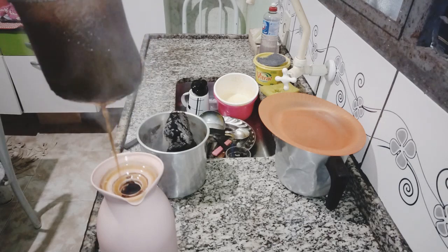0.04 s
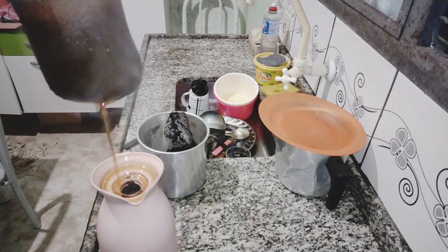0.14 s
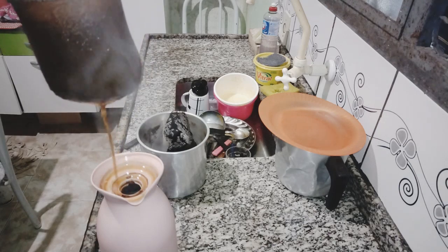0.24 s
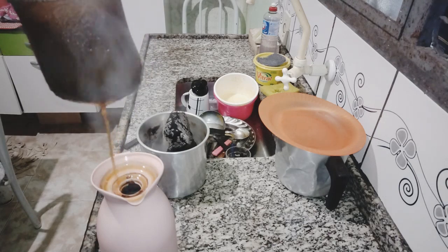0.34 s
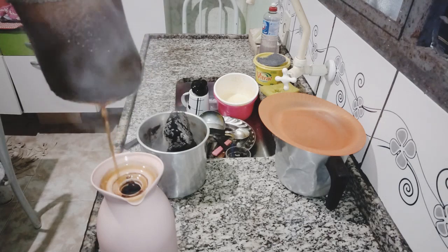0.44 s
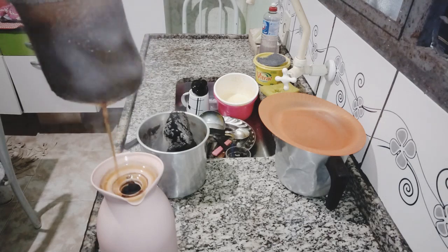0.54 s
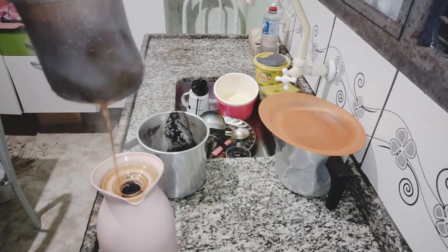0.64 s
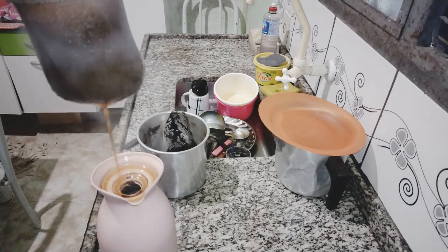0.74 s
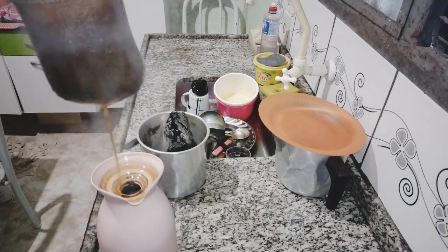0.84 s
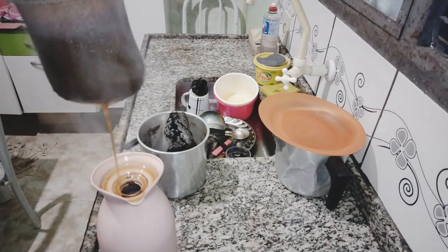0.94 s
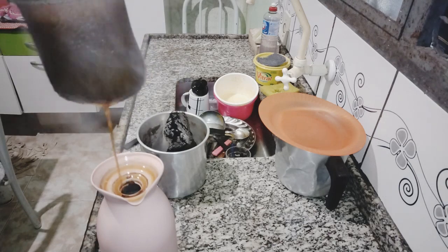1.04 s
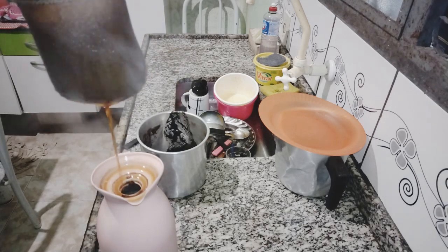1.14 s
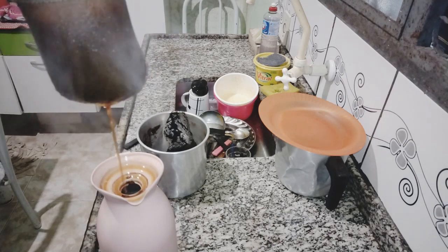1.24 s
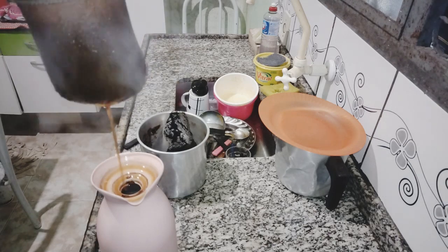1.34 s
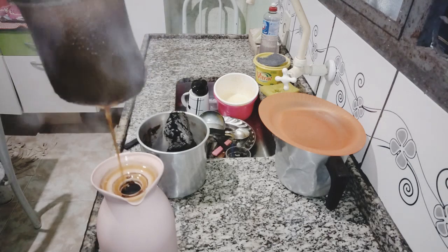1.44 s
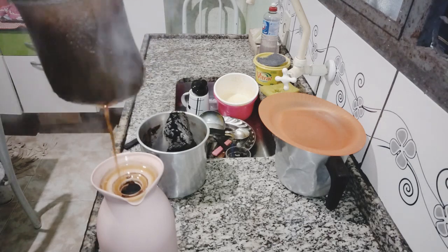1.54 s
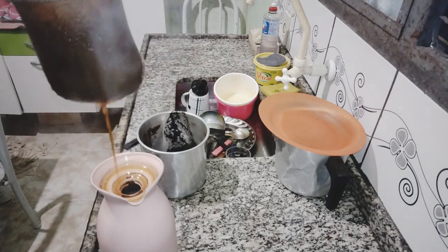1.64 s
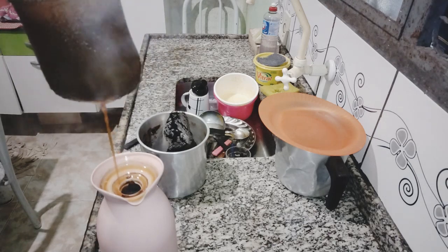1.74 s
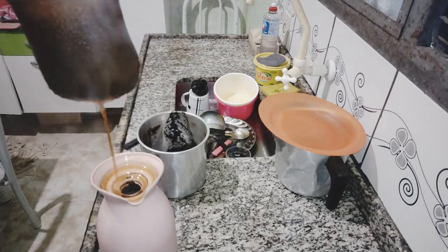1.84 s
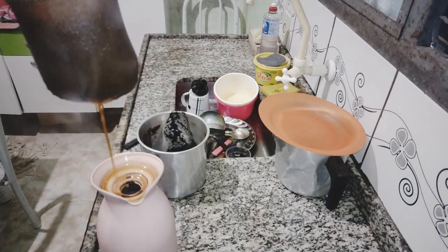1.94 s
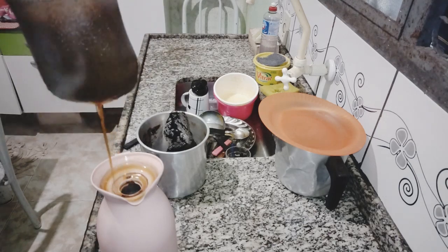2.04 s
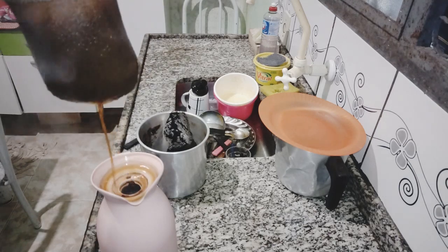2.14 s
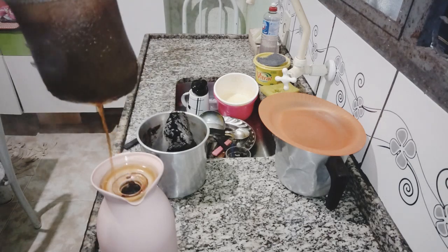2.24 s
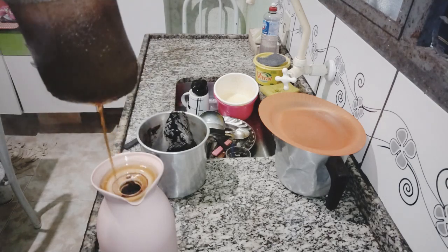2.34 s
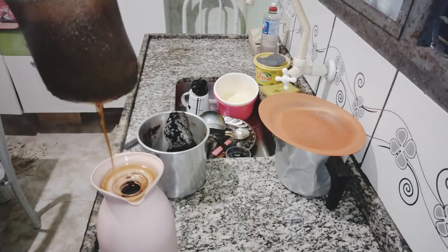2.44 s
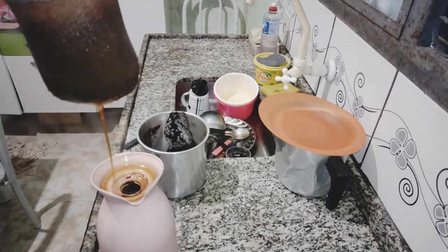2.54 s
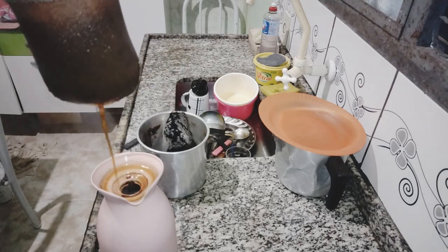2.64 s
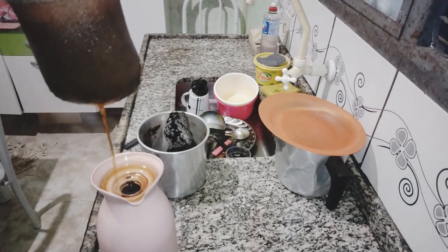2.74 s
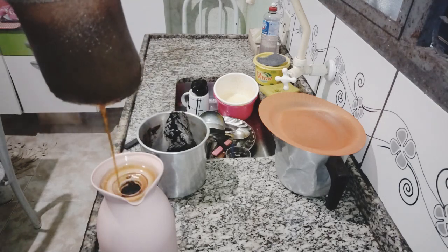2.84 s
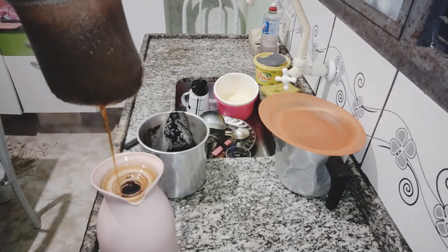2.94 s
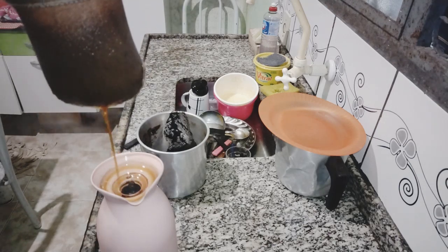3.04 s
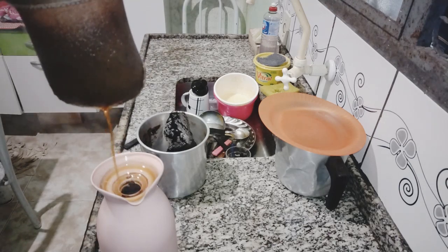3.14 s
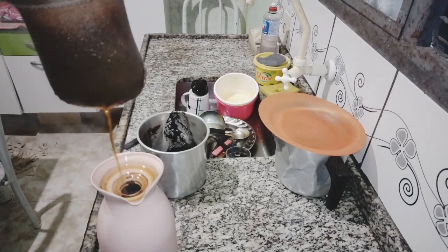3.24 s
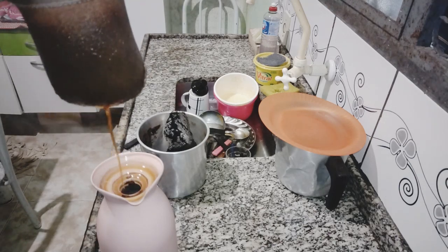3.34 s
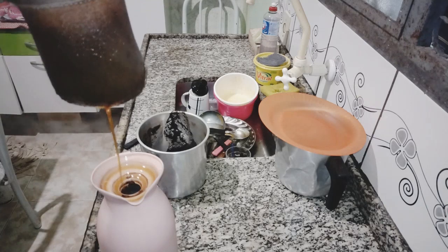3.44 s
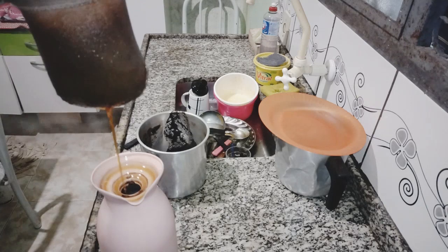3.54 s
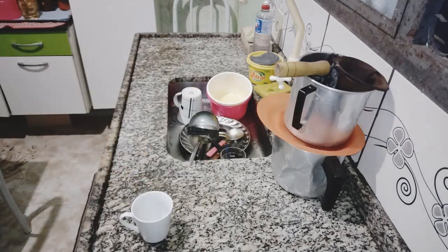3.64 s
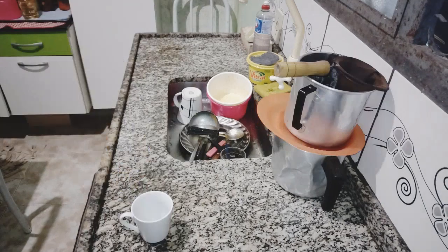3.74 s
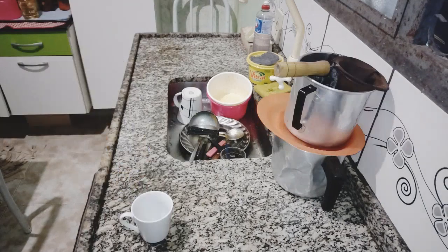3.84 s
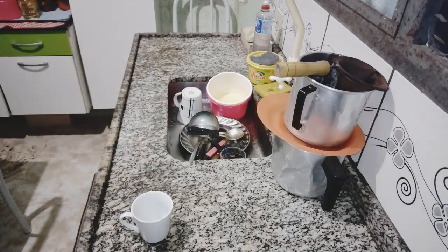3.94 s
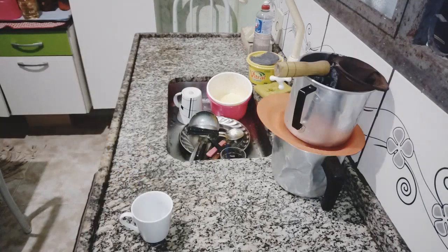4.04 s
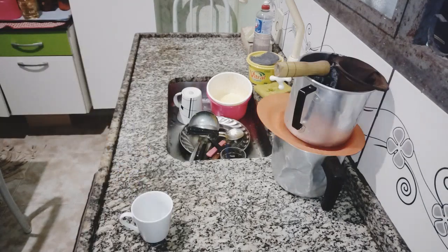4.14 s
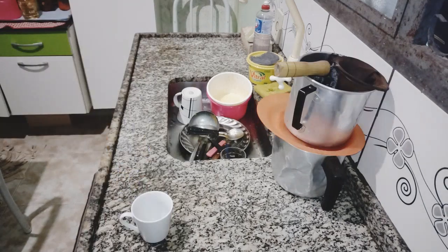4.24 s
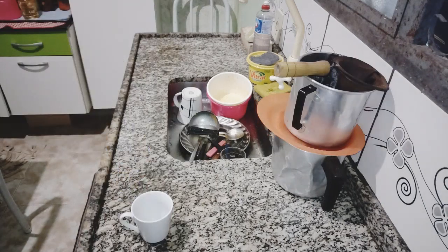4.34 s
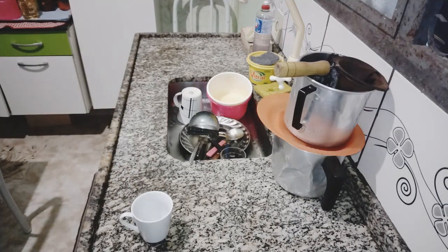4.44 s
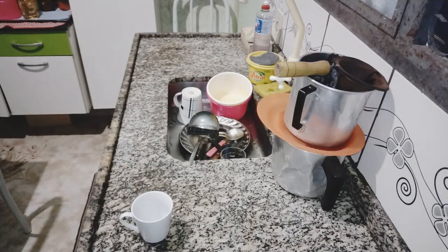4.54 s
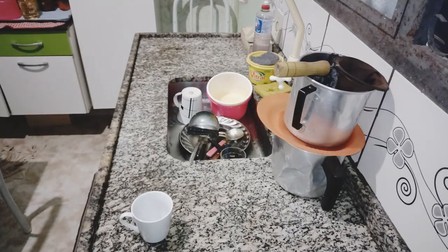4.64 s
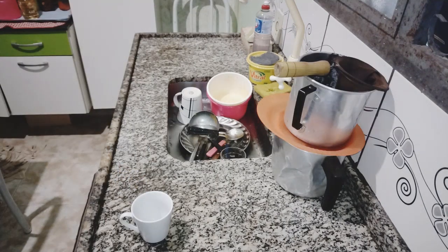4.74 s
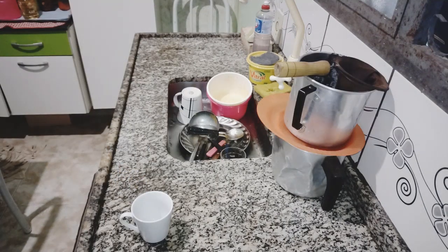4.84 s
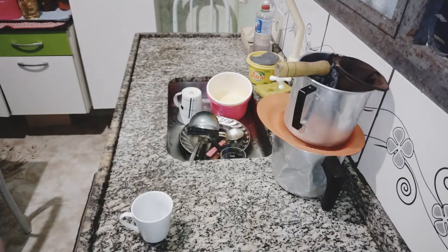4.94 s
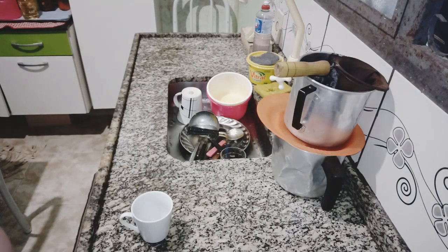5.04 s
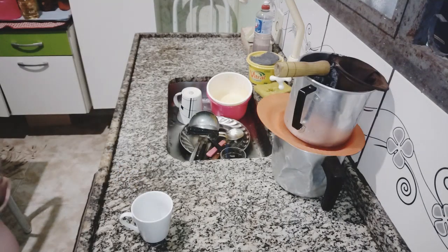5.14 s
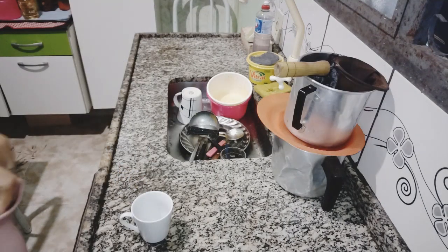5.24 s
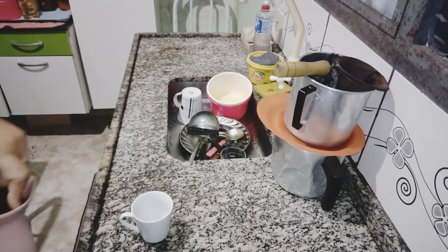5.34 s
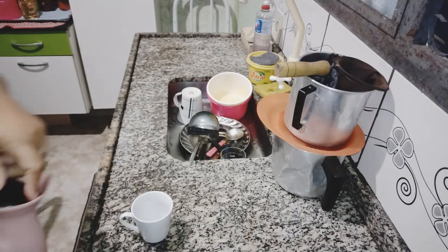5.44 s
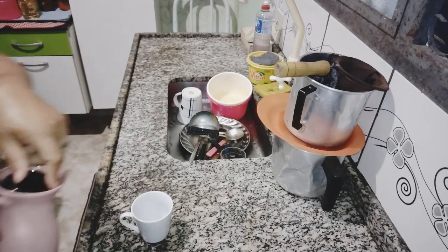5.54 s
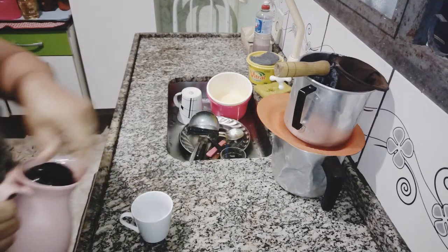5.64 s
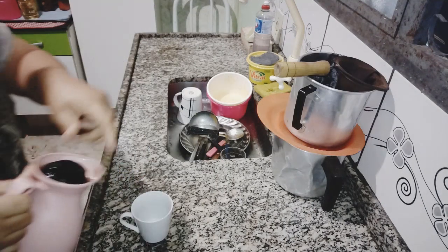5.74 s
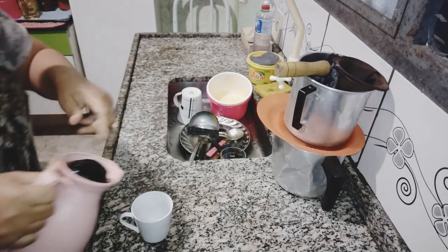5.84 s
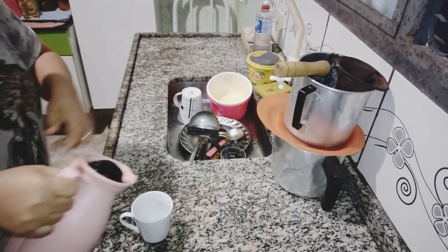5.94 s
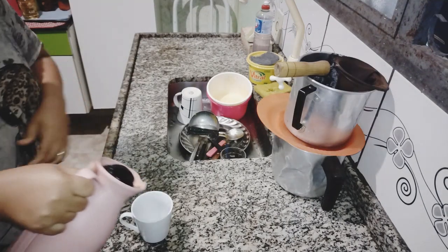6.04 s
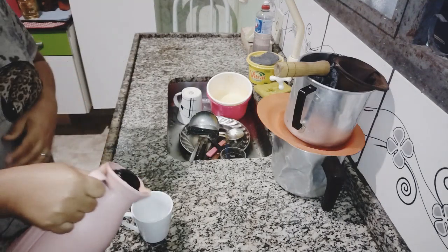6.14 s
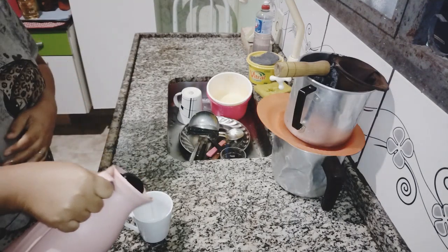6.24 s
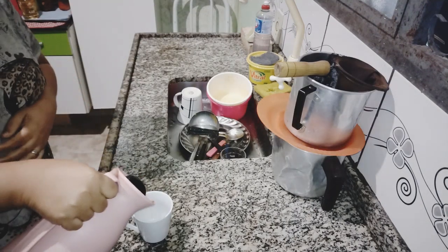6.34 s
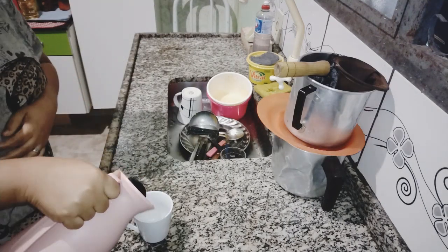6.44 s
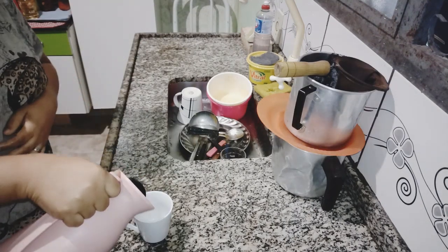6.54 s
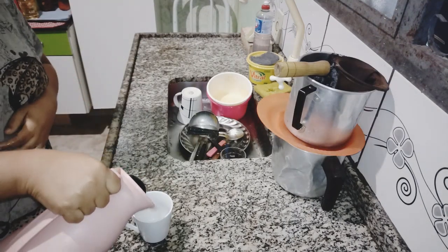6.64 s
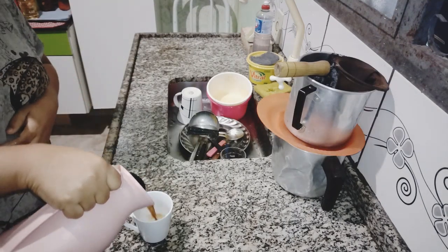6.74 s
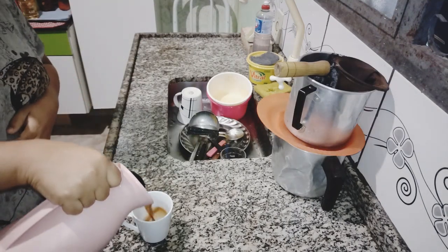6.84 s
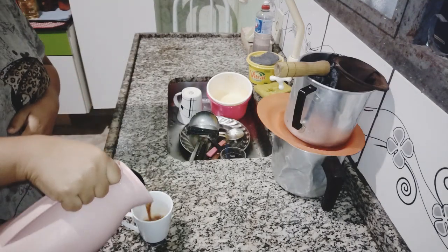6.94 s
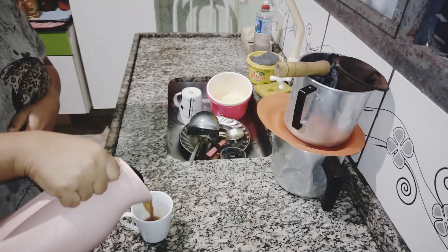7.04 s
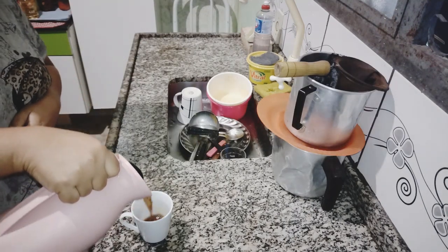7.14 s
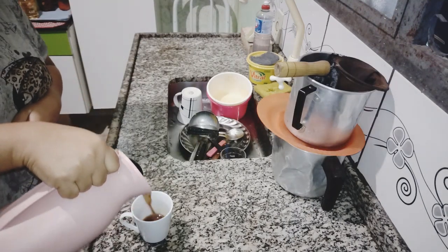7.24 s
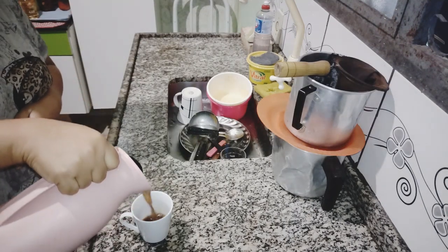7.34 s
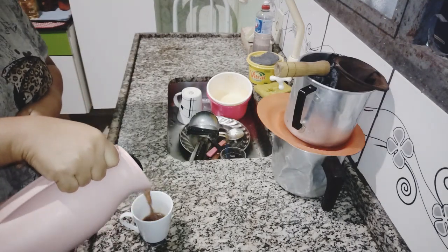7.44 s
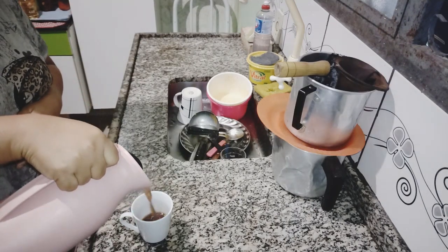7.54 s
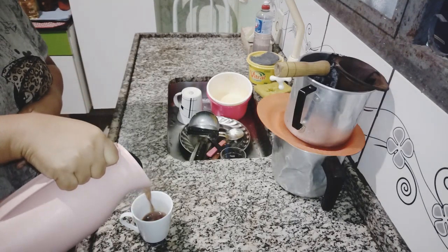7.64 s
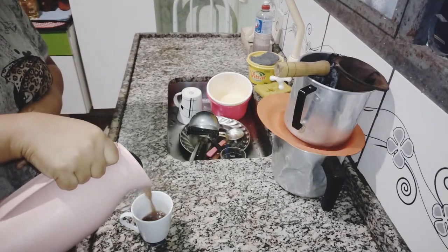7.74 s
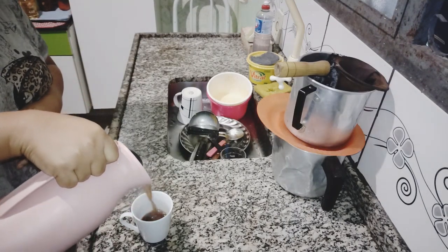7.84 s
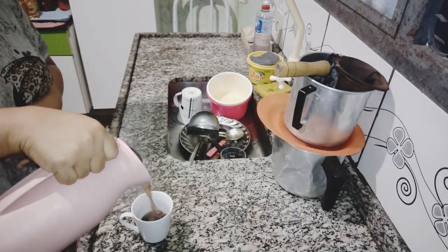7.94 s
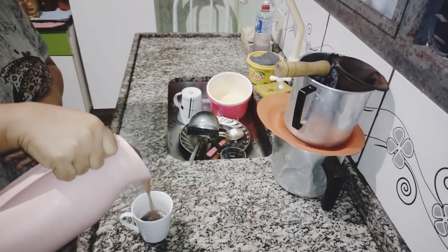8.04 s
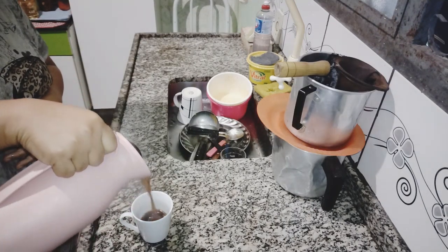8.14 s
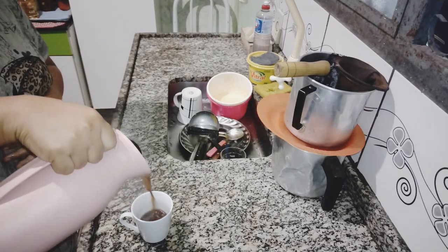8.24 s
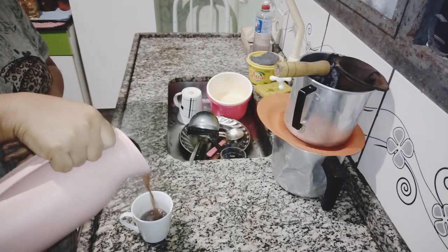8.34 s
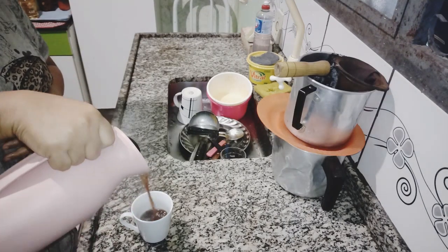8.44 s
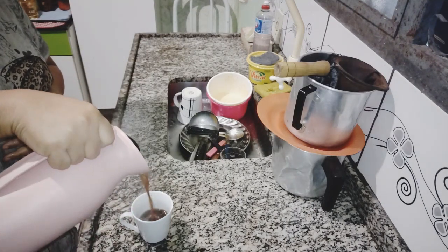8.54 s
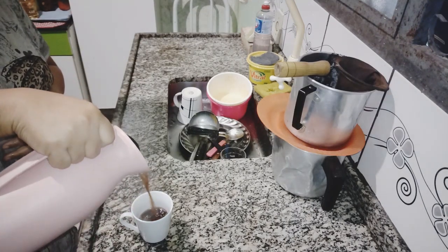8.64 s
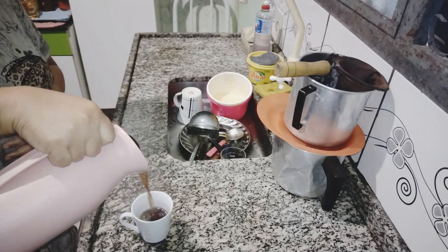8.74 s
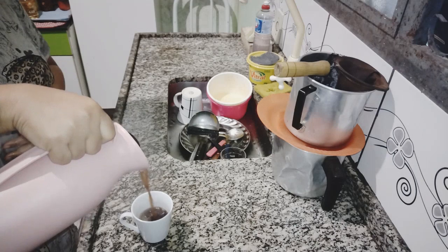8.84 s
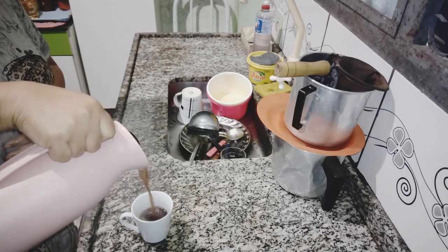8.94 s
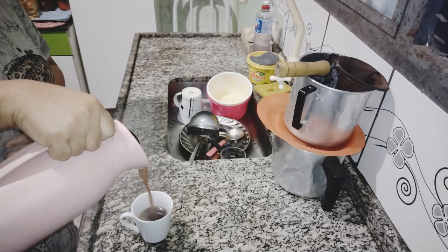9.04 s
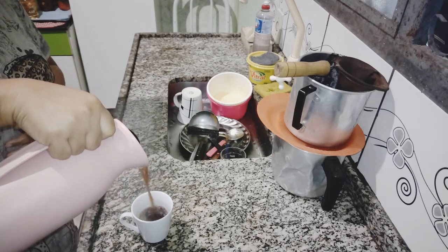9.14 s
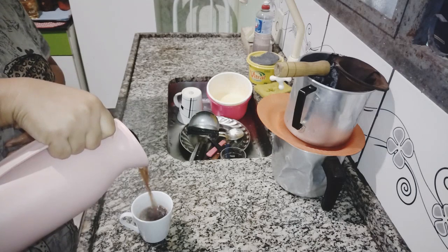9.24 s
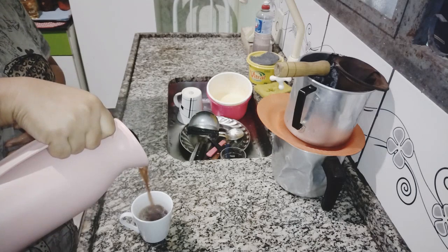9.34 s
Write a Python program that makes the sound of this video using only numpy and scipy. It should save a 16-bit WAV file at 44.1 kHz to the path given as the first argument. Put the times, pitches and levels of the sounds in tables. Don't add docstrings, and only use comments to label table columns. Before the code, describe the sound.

In a hard, echoing kitchen, a close stereo microphone hears a thin, uneven trickle of coffee falling into a narrow flask, with separate bubbles and bright ticks ringing its hollow air. After a short total silence, hands brush softly, small plastic clicks lead to one loud lid snap, then a few quiet touches. Coffee pours into a cup, splashy and crackling, with gulps and a deepening bubbling beneath a rising cup tone.

```python
import sys
import numpy as np
from scipy import signal
from scipy.fft import rfft, irfft
from scipy.io import wavfile
from scipy.ndimage import uniform_filter1d

SR = 44100
rng = np.random.default_rng(int(sys.argv[2]) if len(sys.argv) > 2 else 0)


def dump_mix(stems):
    frames = np.atleast_2d(stems).T
    limited = np.clip(frames, -1, 1)
    pcm = np.round(limited * 32767).astype(np.int16)
    wavfile.write(sys.argv[1], SR, pcm)


def nominal_scale(level):
    x = np.asarray(level, float) / 20
    return 10 ** x


N = 414540
GAP_START_S, GAP_END_S = 3.605, 3.885


def evened(x):
    return x / np.sqrt(np.mean(x ** 2) + 1e-20)


def columns(rows):
    s, *values = np.transpose(rows)
    return [np.interp(np.arange(N) / SR, s, v, -200, -200) for v in values]


def read(points, hz):
    f, value = np.transpose(points)
    return np.interp(np.log(hz + 1), np.log(f + 1), value)


def colour(x, points):
    return irfft(rfft(x) * nominal_scale(read(points, np.fft.rfftfreq(N, 1 / SR))), N)


def resonate(x, hz, width_hz):
    r = np.exp(-np.pi * abs(width_hz) / SR)
    if np.ndim(hz) == 0:
        pole = r * np.exp(2j * np.pi * hz / SR)
        return 2 * signal.lfilter([1 - r], [1, -pole], x).real
    turn = np.exp(2j * np.pi * np.cumsum(hz) / SR)
    return 2 * (turn * signal.lfilter([1 - r], [1, -r], x / turn)).real


def body(x, modes):
    return sum((-1) ** k * nominal_scale(db) * resonate(x, hz, width_hz) for k, (hz, width_hz, db) in enumerate(modes))


def bubbles(s, db, hz, cycles, glide, rise=0.19):
    i = np.arange(600)
    turns = i / SR * hz[:, None]
    shape = np.exp(-turns / cycles) * np.tanh(turns / rise) ** 2 * np.tanh(i[::-1] / 60)
    wave = nominal_scale(db)[:, None] * shape * np.sin(2 * np.pi * turns * (1 + glide * turns))
    at = (s * SR).astype(int)[:, None] + i
    return np.bincount(at.ravel(), wave.ravel(), N + 600)[:N]


def swarm(span_s, lo_hz, hi_hz, spread_db, cycles, count, rise=0.28):
    when, size, luck = rng.random((count, 3)).T
    s = span_s[0] + (span_s[1] - span_s[0]) * when
    hz = lo_hz * (hi_hz / lo_hz) ** size
    return bubbles(s, -spread_db * np.log(1.035 - luck), hz, cycles, 0.015, rise)


def pops(s, db, hz, spray_db, spray_hz):
    t = np.arange(300) / SR
    shape = (np.exp(-t / 0.00065) + 0.32 * np.exp(-t / 0.0038)) * np.tanh(t / 0.00027)
    puffs = nominal_scale(db + spray_db)[:, None] * rng.standard_normal((len(s), 300)) * shape
    at = (s * SR).astype(int)[:, None] + np.arange(300)
    puffs = np.bincount(at.ravel(), puffs.ravel(), N)
    spray = signal.lfilter(*signal.butter(2, spray_hz, "band", fs=SR), puffs)
    return bubbles(s, db, hz, 4.9, 0.00093, 1.1) + spray


def strokes(rows):
    t = np.arange(N) / SR
    return np.max([db - np.where(t < s, rise * (s - t), fall * (t - s)) for s, db, rise, fall in rows], axis=0)


def clumps(depth_db, per_s):
    t = np.arange(0, N + 200, 200) / SR
    hz, turn = np.geomspace(2, per_s, num=24)[:, None], rng.random((24, 1))
    wobble = evened(np.sin(2 * np.pi * (hz * t + turn)).sum(0))
    return nominal_scale(depth_db * np.interp(np.arange(N) / SR, t, wobble))


def steady(x, db):
    return nominal_scale(db) * x / np.sqrt(abs(uniform_filter1d(x ** 2, size=9000)) + 1e-12)


def place(x, pan_db, lag):
    return np.array([np.roll(x, lag) * nominal_scale(pan_db / 2), x * nominal_scale(-pan_db / 2)])


# [f/Hz, level/dB per Hz]
AIR_SPECTRUM = [(5, -6), (10, -6.5), (18, -18), (30, -25), (60, -27.5), (240, -39.5), (600, -46),
                (2750, -54.5), (7200, -57), (9500, -49.5), (12000, -53.5), (16000, -58)]
# [f/Hz, likeness/1]
AIR_LIKENESS = [(60, 0.018), (240, 0.011), (950, 0.06), (3770, 0.037), (15000, 1)]


def air():
    a, b = rfft(rng.standard_normal((2, N)))
    hz = np.fft.rfftfreq(N, 1 / SR)
    same = np.clip(read(AIR_LIKENESS, hz), -1, 1)
    pair = np.array([a, same * a + np.sqrt(1 - same ** 2) * b])
    return nominal_scale(-50) * evened(irfft(pair * nominal_scale(read(AIR_SPECTRUM, hz)), N))


# [f/Hz, t60/s]
KITCHEN_T60 = [(100, 0.6), (500, 0.46), (1400, 0.53), (3800, 0.28), (8000, 0.3), (14000, 0.15)]
# [f/Hz, likeness/1]
ECHO_LIKENESS = [(100, 1), (600, 0.24), (2000, 0.13), (8000, 0.75)]


def kitchen(x):
    taps = np.zeros((6, SR))
    at = np.arange(130, SR - 20, 20) + rng.integers(0, 20, (6, (SR - 131) // 20))
    np.put_along_axis(taps, at, rng.choice([-1., 1.], at.shape), 1)
    hz, t, z = signal.stft(taps, SR, nperseg=256)
    same = np.clip(read(ECHO_LIKENESS, hz), 0, 1)[:, None]
    z = np.concatenate([z[:3], same * z[:3] + np.sqrt(1 - same ** 2) * z[3:]])
    decay = nominal_scale(-60 * t / read(KITCHEN_T60, hz)[:, None])
    tails = signal.istft(z * decay, SR, nperseg=256)[1]
    turn = np.cos(2 * np.pi * (np.arange(N) / SR * 6 + np.arange(3)[:, None] / 3))
    wet = signal.fftconvolve(np.tile(x * turn, (2, 1)), tails / np.linalg.norm(tails[0]), axes=1)[:, :N]
    return wet.reshape(2, 3, N).sum(1)


# [t/s, level/dB, rise/dB per s, fall/dB per s]
HAND_STROKES = [
    (4.06, -48, 700, 73),
    (4.25, -68, 300, 104),
    (5.05, -57.5, 46, 102),
    (5.14, -42, 375, 141),
    (5.5, -79, 905, 100),
    (5.8, -69.5, 15, 13),
    (6.6, -70, 500, 204),
]
# [f/Hz, level/dB per Hz]
CLOTH_SPECTRUM = [(150, -53.5), (250, -4), (342, 12.5), (444, -4.5), (831, -4), (2020, -21), (5830, -14),
                  (9170, -1.5), (16000, -12.5)]


def rustle():
    start_s, end_s = 3.89, 6.8
    grains = swarm((start_s, end_s), 2040, 16000, 3.4, 1.5, count=8000)
    t = np.arange(N) / SR
    return steady(colour(grains, CLOTH_SPECTRUM), strokes(HAND_STROKES) - 3.1) * (t > start_s) * (t < end_s)


# [t/s, peak level/dB, hollow body level/dB, body f/Hz, middle level/dB]
PLASTIC_SNAPS = [(2.0645, -33.5, -64.5, 269, -40.5), (2.4181, -43.5, -61, 354, -48),
                 (2.8401, -37.5, -59, 260, -33.5), (4.0548, -39.5, -54.5, 341, -45),
                 (4.088, -42.5, -60, 332, -46), (4.1339, -42.5, -70, 347, -66),
                 (4.407, -47.5, -76, 380, -85), (4.6506, -74, -76.5, 250, -49.5),
                 (4.7123, -49.5, -63, 428, -50), (4.761, -47, -60.5, 331, -47),
                 (4.8873, -44.5, -79, 267, -42), (4.9835, -31, -66.5, 855, -37),
                 (5.0847, -8.5, -27.5, 475, -11.5), (5.497, -76, -56, 287, -80),
                 (5.5223, -67.5, -53, 516, -54), (5.734, -52, -75, 700, -56), (5.7598, -40, -67, 686, -38),
                 (5.764, -33.5, -46, 748, -30.5), (6.5991, -68, -56.5, 292, -66)]
# [f/Hz, peak level/dB, t60/s]
LID_MODES = [(203, -33.5, 0.1), (292, -33, 0.069), (1500, -36.5, 0.03), (3970, -23.5, 0.04),
             (8830, -29, 0.04), (9900, -22, 0.04)]


def snaps():
    pair, send, t = np.zeros((2, N)), np.zeros(N), np.arange(900) / SR
    bands_hz = [6800, 11130], [1700, 6500], [198, 1120], [11200, 19000]
    bands = [signal.butter(2, edges_hz, "band", fs=SR) for edges_hz in bands_hz]
    fade = np.hanning(2 * len(t))[len(t):]
    pan_db = -7.0
    for s, db, body_db, body_hz, mid_db in PLASTIC_SNAPS:
        bursts = rng.standard_normal((4, len(t))) * np.exp(-(t / 0.0056) ** 2) * np.tanh(t / 0.0005)
        gains = nominal_scale(np.array([db + 0.3, mid_db - 2.2, body_db + 7.5, db - 7.5]))
        high, mid, low, top = (g * signal.lfilter(*band, x) for g, band, x in zip(gains, bands, bursts))
        knock = nominal_scale(body_db - 610 * t) * np.sin(2 * np.pi * body_hz * t)
        crack = place(high, pan_db, lag=0) + place(mid, pan_db / 3, lag=0) + low + top
        at = round(s * SR)
        pair[:, at:at + len(t)] += (crack + knock) * fade
        spreads = 11.0, 10.0, 18.0, 7.0
        spread = sum(g * k * signal.lfilter(*band, t == 0) for g, k, band in zip(gains, spreads, bands))
        send[at:at + len(t)] += spread + 0.39 * knock * fade
    t = np.maximum(np.arange(N) / SR - 5.0855, 0)
    jolt = [(113, -21.5, 0.037)]  # f/Hz, level/dB, t60/s
    thump = sum(nominal_scale(db - 60 * t / t60) * np.sin(2 * np.pi * hz * t) for hz, db, t60 in jolt + list(LID_MODES))
    return pair + thump, send + 0.29 * thump


# [t/s, peak level/dB, f/Hz]
FLASK_PLOPS = [(0.044, -44, 860), (0.188, -45.5, 734), (0.232, -41.5, 700), (0.477, -43.5, 1150),
               (0.519, -50, 1140), (0.631, -50.5, 440), (0.917, -40, 990), (0.936, -42, 785),
               (1.033, -37.5, 596), (1.094, -40.5, 865), (1.213, -45, 710), (1.237, -44.5, 810),
               (1.369, -47, 695), (1.403, -40, 710), (1.446, -50, 396), (1.479, -46.5, 750),
               (1.52, -43.5, 716), (1.59, -57, 410), (1.663, -46.5, 410), (2.105, -53.5, 900),
               (2.194, -52, 1180), (2.449, -55, 440), (3.002, -41.5, 760), (3.194, -44.5, 1320),
               (3.395, -45.5, 940), (3.444, -51, 693), (3.537, -48, 778)]
# [t/s, peak level/dB, f/Hz]
FLASK_BLIPS = [(0.0458, -38.5, 1820), (0.0756, -40.5, 1920), (0.1386, -38.5, 3920), (0.2219, -46.5, 2230),
               (0.3383, -54, 2500), (0.387, -45.5, 1500), (0.387, -34, 2370), (0.4778, -44, 1820),
               (0.5163, -33.5, 2640), (0.633, -37, 1830), (0.6506, -42.5, 1830), (0.6885, -45, 2510),
               (0.729, -36.5, 2750), (0.7936, -43, 1830), (0.8749, -36, 2200), (0.9184, -37, 1820),
               (0.9943, -51, 2650), (1.0495, -47, 1910), (1.067, -36.5, 2750), (1.093, -51, 2510),
               (1.1635, -49.5, 2640), (1.176, -43.5, 2200), (1.2341, -44.5, 2560), (1.334, -32, 2510),
               (1.3704, -47, 2330), (1.404, -39, 2210), (1.4376, -44, 2800), (1.505, -40, 4060),
               (1.5206, -42, 2800), (1.597, -43, 2840), (1.6459, -39.5, 2250), (1.7466, -48.5, 1830),
               (1.9157, -44, 3120), (1.9909, -50, 2740), (2.0535, -55, 2600), (2.0654, -48, 3800),
               (2.093, -46, 4030), (2.2804, -54, 3060), (2.4186, -46.5, 3750), (2.491, -35, 2720),
               (2.573, -41.5, 3750), (2.7069, -43, 1830), (2.7477, -43, 1860), (2.8419, -42, 3970),
               (2.9712, -42, 3897), (3.0018, -45, 2700), (3.0513, -40.5, 2660), (3.0719, -40, 2510),
               (3.1899, -43, 2670), (3.226, -41, 1830), (3.3117, -45.5, 3950), (3.3959, -31, 1830),
               (3.5199, -38.5, 2760)]
# [t/s, peak level/dB, f/Hz]
FLASK_TICKS = [(0.0456, -43, 10000), (0.0747, -49, 12500), (0.11, -39.5, 11100), (0.1397, -35, 10800),
               (0.153, -35, 11100), (0.3024, -42.5, 10900), (0.3416, -55, 5400), (0.378, -47, 5690),
               (0.4514, -43.5, 9170), (0.5179, -39.5, 9400), (0.619, -46, 11000), (0.6815, -42.5, 11000),
               (0.729, -36.5, 10760), (0.7657, -43, 7720), (0.7933, -31.5, 12900), (0.8753, -36, 11100),
               (0.9413, -41.5, 14400), (0.9682, -36.5, 11100), (1.1109, -43, 13000), (1.1763, -37.5, 11100),
               (1.2385, -35.5, 5670), (1.3708, -38.5, 13800), (1.3997, -45.5, 14600), (1.429, -44, 12500),
               (1.4576, -40, 5600), (1.5225, -45.5, 10800), (1.5514, -45, 11100), (1.5743, -48, 5540),
               (1.5979, -38, 13400), (1.5997, -38.5, 14700), (1.6095, -39.5, 11100), (1.645, -42, 10600),
               (1.7384, -42.5, 11100), (1.8746, -46, 11500), (1.917, -44, 8640), (1.945, -39, 8600),
               (2.0173, -44, 10200), (2.0645, -30, 7600), (2.2788, -42, 8500), (2.365, -50.5, 8700),
               (2.4184, -46, 8840), (2.4526, -40.5, 9260), (2.5393, -43.5, 9600), (2.5714, -40, 10400),
               (2.7053, -47, 8490), (2.826, -43, 11700), (2.8388, -29, 8340), (3.0185, -50, 13100),
               (3.0356, -38, 8600), (3.05, -32.5, 11400), (3.0734, -33.5, 11100), (3.1228, -41.5, 9960),
               (3.155, -36.5, 7900), (3.248, -40, 8700), (3.3964, -38.5, 5690), (3.4915, -40, 11100),
               (3.521, -42, 5500), (3.5206, -34, 5870)]
# [t/s, peak level/dB, f/Hz]
OPENING_BURST = [
    (0.002, -36, 11000),
    (0.004, -38, 8360),
]
# [t/s, flow level/dB]
TRICKLE_FLOW = [(0.0, -49), (0.26, -58), (0.43, -73), (0.53, -60), (0.79, -70), (1.06, -50), (1.16, -62.5),
                (1.54, -50), (1.88, -67.5), (2.4, -77), (2.5, -54), (2.94, -86), (3.0, -61.5), (3.36, -64),
                (3.46, -54), (3.6, -65)]
# [t/s, level/dB]
SPLATTER_LEVEL = [(0.0, -57.5), (0.12, -60.5), (0.2, -53.5), (0.35, -68.5), (0.6, -64), (0.75, -61),
                  (1.0, -63), (1.6, -62.5), (1.8, -66), (2.1, -63), (2.4, -69), (2.55, -63), (2.8, -69),
                  (3.07, -54.5), (3.3, -59), (3.38, -65.5), (3.6, -65)]
# [f/Hz, width/Hz, level/dB]
BELLY_MODES = [(226.2, 22, 1.5), (371, 9.9, 6), (716, 470, -8.5)]
# [f/Hz, width/Hz, level/dB]
NECK_MODES = [(1830, 76, -8.5), (2510, 320, -4), (3950, 120, -6.5), (5900, 170, -3), (6060, 72, -22.5),
              (7890, 83, -6.5), (8270, 250, -9), (9960, 250, 2), (11100, 170, -3), (13000, 380, -1.5),
              (14500, 340, -18.5)]


def flask():
    span_s, flow_db = (0, TRICKLE_FLOW[-1][0]), columns(TRICKLE_FLOW)[0]
    surge_db = flow_db + 62
    on = np.arange(N) < span_s[1] * SR
    plops = nominal_scale(5.0) * bubbles(*np.transpose(FLASK_PLOPS), 1.35, 0.024)
    blips = nominal_scale(3.5) * bubbles(*np.transpose(FLASK_BLIPS), 1.4, 0.00727, 0.42)
    films = np.transpose(FLASK_TICKS + OPENING_BURST)
    ticks = nominal_scale(6.0) * pops(*films, spray_db=-3.5, spray_hz=(5200, 13300))
    churn = steady(body(swarm(span_s, 188, 1400, 2.1, 0.2, count=500), BELLY_MODES), flow_db - 5.5)
    middle = swarm(span_s, 1610, 3370, 10.0, 2.2, count=1100)
    fizz = clumps(7.0, 25) * swarm(span_s, 3600, 15000, 8.2, 1.2, count=4000, rise=0.78)
    middle_db = -74 + 0.72 * surge_db
    fizz_db = columns(SPLATTER_LEVEL)[0] - 3.5 + 0.1 * surge_db
    small = steady(body(middle, NECK_MODES) + 0.26 * middle, middle_db)
    small = small + steady(body(fizz, NECK_MODES) + 0.092 * fizz, fizz_db)
    rung = nominal_scale(-0.5) * body(plops, BELLY_MODES)
    rung = rung + nominal_scale(15.0) * body(blips + plops + nominal_scale(-5.5) * ticks, NECK_MODES)
    return plops + blips + ticks + rung + churn + small * on


# [t/s, peak level/dB, f/Hz]
CUP_GULPS = [(6.876, -43, 3950), (7.1413, -38.5, 2270), (7.208, -32.5, 1710), (7.397, -40, 1330),
             (7.417, -35, 1660), (7.4407, -41, 1280), (7.4565, -34.5, 1400), (7.4933, -38, 1370),
             (7.5283, -42, 1400), (7.5716, -40, 1490), (7.7387, -33, 1320), (7.785, -37.5, 1430),
             (7.8695, -45, 1500), (7.9405, -41, 1440), (7.9548, -38, 1600), (7.9744, -39, 1640),
             (7.9887, -36, 1370), (8.0094, -42, 1360), (8.06, -39, 1400), (8.1216, -39, 1530),
             (8.1648, -44, 1410), (8.1813, -36.5, 1700), (8.234, -40, 1590), (8.2738, -42, 1630),
             (8.307, -32, 1660), (8.3324, -42, 1700), (8.3452, -38.5, 1500), (8.4168, -36, 1580),
             (8.4292, -34.5, 1620), (8.473, -41, 1520), (8.5434, -43, 1640), (8.564, -42, 1550),
             (8.5875, -32.5, 1670), (8.6215, -40, 1600), (8.6652, -41, 1760), (8.6816, -34, 1680),
             (8.7188, -38, 1590), (8.731, -36, 1710), (8.7505, -38, 1680), (8.8123, -47, 1710),
             (8.8318, -41, 1680), (8.8714, -46, 1660), (8.962, -32, 1750), (9.027, -43, 1680),
             (9.0677, -40, 1700), (9.084, -36, 1760), (9.1127, -37, 2030), (9.136, -38, 1840),
             (9.1705, -35.5, 1690), (9.2313, -41, 1800)]
# [t/s, peak level/dB, f/Hz]
CUP_GLUGS = [(7.571, -50, 1010), (7.61, -50, 810), (7.649, -47, 900), (7.698, -41, 845), (7.737, -52, 1010),
             (7.765, -47, 770), (7.786, -47, 821), (7.81, -45, 796), (7.846, -52, 670), (7.869, -44, 810),
             (7.926, -39, 800), (7.954, -34.5, 810), (8.031, -47, 675), (8.058, -42, 614),
             (8.091, -42.5, 590), (8.138, -45, 686), (8.18, -42, 680), (8.221, -39, 678), (8.247, -43, 644),
             (8.274, -37, 710), (8.307, -32, 570), (8.381, -40, 585), (8.405, -45, 573),
             (8.428, -34.5, 600), (8.452, -35.5, 677), (8.526, -36.5, 576), (8.585, -40, 446),
             (8.689, -40.5, 600), (8.729, -37.5, 645), (8.757, -44, 630), (8.824, -45.5, 371),
             (8.868, -48, 680), (8.889, -52, 676), (9.028, -42.5, 468), (9.066, -45, 372),
             (9.083, -46, 490), (9.113, -42, 455), (9.145, -47, 453), (9.23, -51, 370), (9.314, -57, 302),
             (9.351, -59, 386), (9.376, -49, 361)]
# [t/s, peak level/dB, f/Hz]
FIRST_DROP_CHIRP = [
    (6.868, -41, 2850),
]
# [t/s, peak level/dB, f/Hz]
CUP_SPITS = [(6.795, -52, 8500), (6.886, -46, 12500), (6.9875, -38.5, 10000), (6.9972, -34, 8650),
             (7.0055, -39.5, 9200), (7.087, -41, 7260), (7.104, -37, 10300), (7.1484, -36, 9700),
             (7.1747, -37, 7710), (7.2219, -33, 7900), (7.2332, -22.5, 8400), (7.2836, -27, 10200),
             (7.3973, -24, 7700), (7.475, -32, 12000), (7.4944, -28.5, 8090), (7.5305, -29.5, 9690),
             (7.5722, -34.5, 9660), (7.5906, -28, 10000), (7.6483, -24, 8400), (7.6742, -32.5, 6690),
             (7.6869, -29.5, 9900), (7.736, -30.5, 8150), (7.8116, -34, 12500), (7.846, -22.5, 10260),
             (7.8936, -31.5, 7040), (7.9236, -37, 9150), (7.952, -27, 7800), (7.9871, -28, 9740),
             (8.0614, -32.5, 10400), (8.084, -31.5, 7650), (8.1378, -30, 7840), (8.1443, -26, 7840),
             (8.2322, -42, 9750), (8.2778, -26.5, 7660), (8.2798, -34, 10100), (8.347, -23, 10500),
             (8.403, -27.5, 8300), (8.413, -32.5, 8130), (8.4283, -21.5, 7400), (8.4734, -19.5, 7800),
             (8.4807, -33, 9400), (8.564, -35, 7660), (8.5875, -26, 12000), (8.641, -29, 10400),
             (8.655, -26.5, 10000), (8.7196, -30.5, 10500), (8.7643, -34, 6060), (8.7909, -27.5, 6100),
             (8.8696, -25, 9500), (8.9358, -24, 9400), (8.997, -33.5, 10600), (9.0381, -34.5, 10300),
             (9.0633, -33, 10500), (9.0927, -29.5, 10100), (9.1151, -40, 10600), (9.1355, -27, 7440),
             (9.1443, -34, 7300), (9.2562, -27.5, 10600), (9.3, -30, 10100), (9.3653, -30, 10400)]
# [t/s, flow level/dB]
POUR_FLOW = [
    (7.07, -56),
    (7.1, -47),
    (7.25, -41.5),
    (7.44, -41.5),
    (8.46, -45.5),
    (8.485, -41.5),
    (8.54, -44.5),
    (9.12, -43.5),
    (9.33, -46.5),
    (9.4, -52),
]
# [t/s, level/dB, rise/dB per s, fall/dB per s]
EARLY_DROPS = [
    (6.87, -51, 3500, 278),
    (7.0, -45.5, 1200, 370),
]
# [t/s, f/Hz]
CLOUD_PITCH = [
    (6.8, 1170),
    (7.7, 830),
    (8.1, 640),
    (8.76, 600),
    (8.86, 450),
    (9.4, 350),
]
# [f/Hz, level/dB per Hz]
SPLASH_SPECTRUM = [(1180, -22), (2000, 8), (2880, -8.5), (3260, -10.5), (4300, -6), (5030, -11),
                   (7510, 7.5), (10100, 11.5), (15200, -3), (16000, -20)]


def cup():
    pour_s = 6.8
    span_s = pour_s, N / SR
    flow_db = np.maximum(columns(POUR_FLOW)[0], strokes(EARLY_DROPS))
    t = np.maximum(np.arange(N) / SR - pour_s, 0)
    cloud_hz = np.interp(t + pour_s, *np.transpose(CLOUD_PITCH))
    cloud_hz = cloud_hz * clumps(0.5, 9)
    column_hz = 1270 / (1 - 0.11 * t)
    mouth_hz = 1.57 * column_hz
    surge_db = 0.88 * (flow_db + 45)
    cloud_db = -59 - 53 * np.exp(-t / 0.4) + surge_db
    column_db = -57 - 36 * np.exp(-t / 0.2) + surge_db

    knocks = swarm(span_s, 235, 3600, 2.65, 0.18, count=2200)
    cloud = resonate(resonate(clumps(3.4, 30) * knocks, cloud_hz, 230), 1.1 * cloud_hz, 450)
    column = resonate(knocks, column_hz, 130) + 0.5 * resonate(knocks, 1.16 * column_hz, 840)
    column = column + nominal_scale(8) * np.exp(-(t / 1.6) ** 2) * resonate(knocks, 1395, 90)
    column = resonate(column, mouth_hz, 1620)
    splash = clumps(6.2, 35) * swarm(span_s, 2422, 14930, 5.5, 7.0, count=9000, rise=0.9)
    splash = colour(splash, SPLASH_SPECTRUM)

    gulps = nominal_scale(3.5) * bubbles(*np.transpose(CUP_GULPS), 3.1, 0.016, 0.9)
    gulps = gulps + bubbles(*np.transpose(FIRST_DROP_CHIRP), 40, 0.0072, 0.6)
    gulps = gulps + nominal_scale(1.0) * bubbles(*np.transpose(CUP_GLUGS), 3.0, 0.011, 0.58)
    spits = nominal_scale(3.0) * pops(*np.transpose(CUP_SPITS), spray_db=-0.5, spray_hz=(5400, 12500))
    crackle = clumps(3.0, 40) * swarm(span_s, 3800, 12500, 8.0, 1.8, count=2500, rise=0.5)
    crackle = steady(crackle, flow_db - 11.0)
    rung = nominal_scale(-14.0) * resonate(gulps, cloud_hz, 94) + nominal_scale(-5.5) * resonate(gulps, column_hz, 97)
    pour = gulps + rung - steady(cloud, cloud_db) + steady(column, column_db) + steady(splash, flow_db - 3.5)
    return pour, spits, crackle


def scene():
    drip, (pour, spits, crackle), hands, (cracks, cracks_send) = flask(), cup(), rustle(), snaps()
    cracks[0] = np.roll(cracks[0], 12)
    dry = place(drip, -2.9, lag=3) + place(pour + spits + crackle, -0.74, lag=3)
    dry = dry + place(hands, -5.0, lag=3) + cracks
    send = nominal_scale(-7.0) * drip + nominal_scale(-1.0) * hands + nominal_scale(-3.0) * cracks_send
    send = send + nominal_scale(-7.5) * spits + nominal_scale(-9.0) * crackle + nominal_scale(-6.5) * pour
    t = np.arange(N) / SR
    first = t < GAP_START_S
    wet = kitchen(send * first) * first + kitchen(send * ~first)
    gate = np.clip(np.maximum(GAP_START_S - t, t - GAP_END_S) / 0.0057, 0, 1)
    return (dry + wet + air()) * gate


def low_pass(x):
    return signal.sosfilt(signal.butter(12, 16990, fs=SR, output="sos"), x)


def record(dry):
    edge = signal.firwin(401, 15950, window=("kaiser", 8), fs=SR)
    low = signal.oaconvolve(dry, edge[None], "same")
    return low_pass(low + nominal_scale(-35.5) * (dry - low))


dry = scene()
out = record(dry)
dump_mix(out)
```